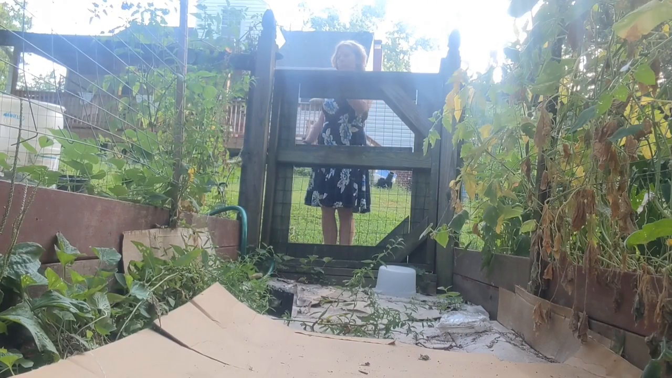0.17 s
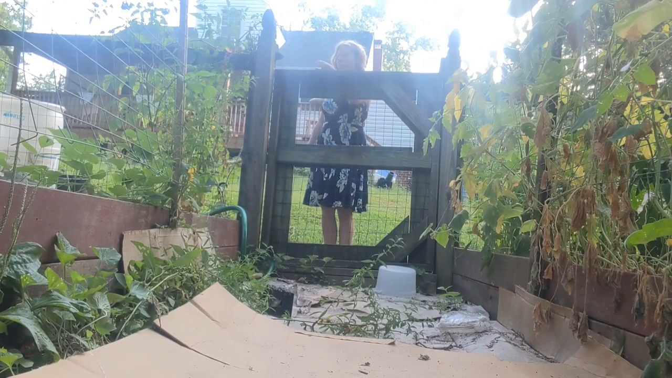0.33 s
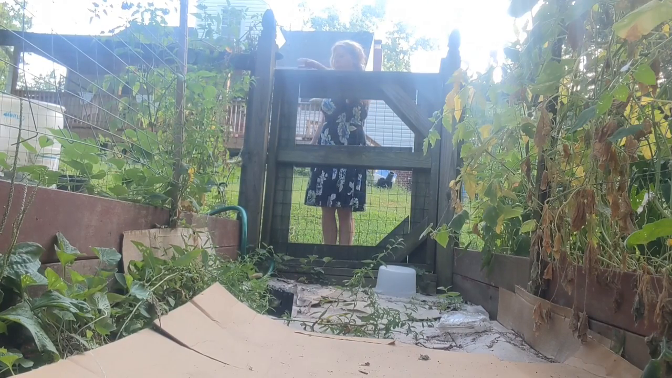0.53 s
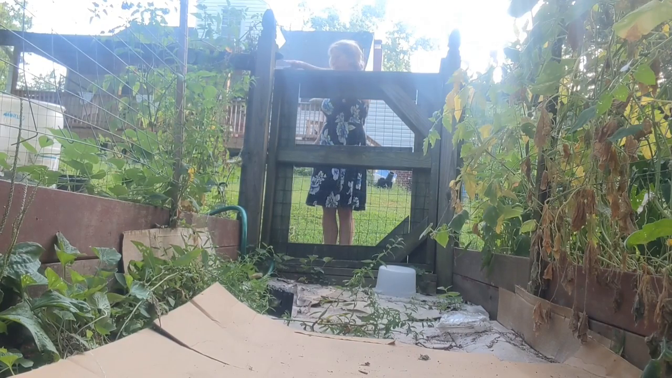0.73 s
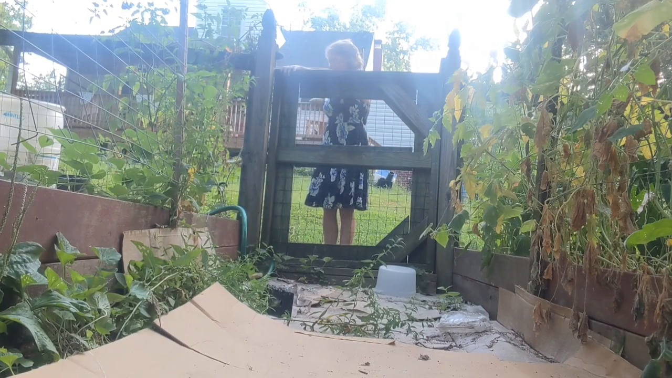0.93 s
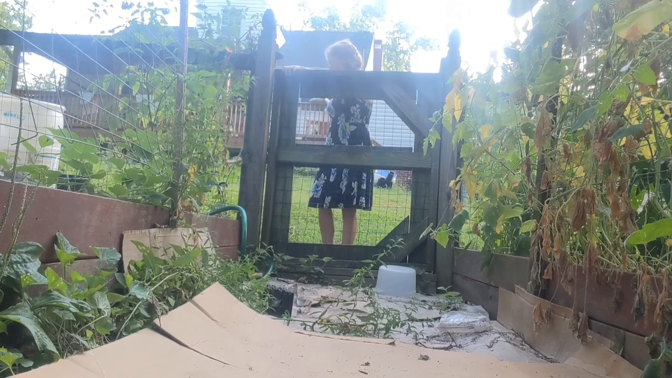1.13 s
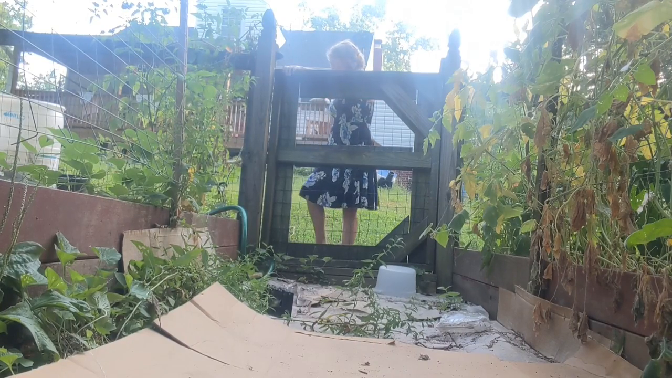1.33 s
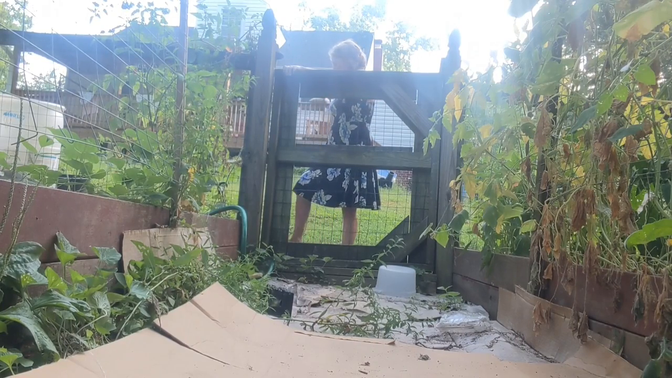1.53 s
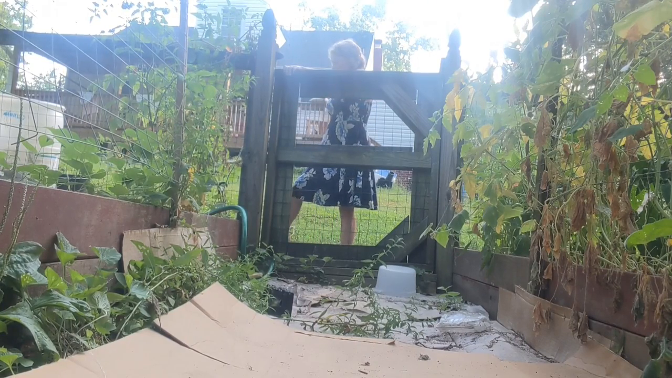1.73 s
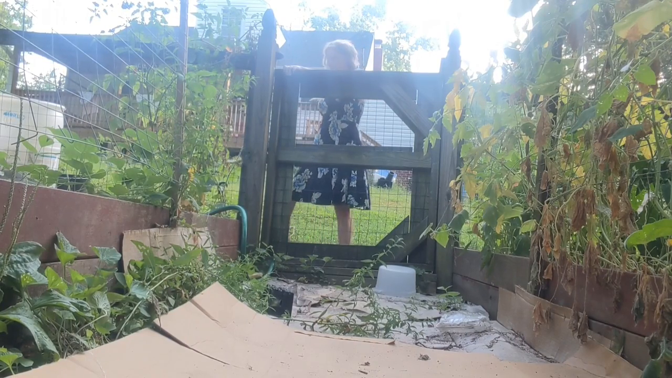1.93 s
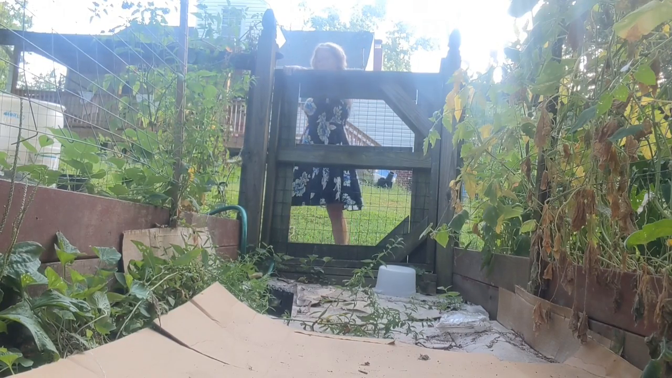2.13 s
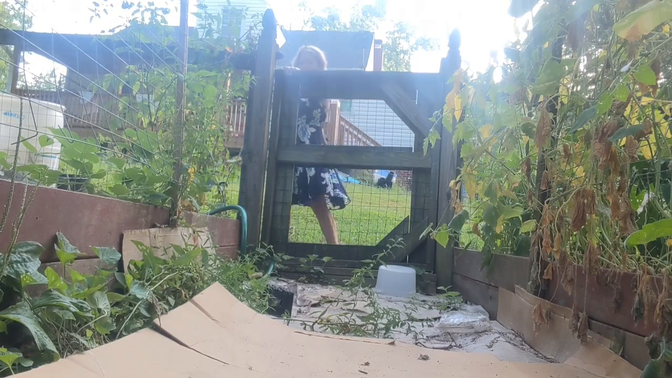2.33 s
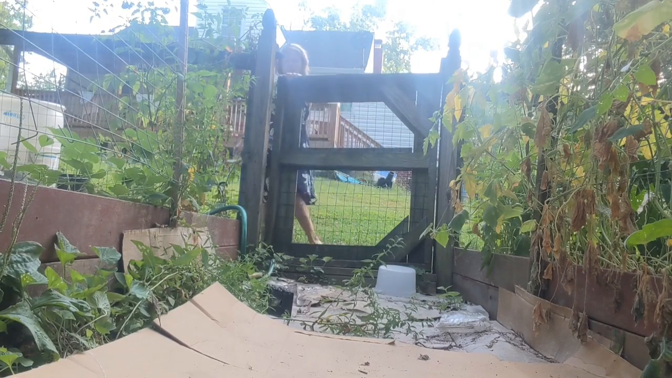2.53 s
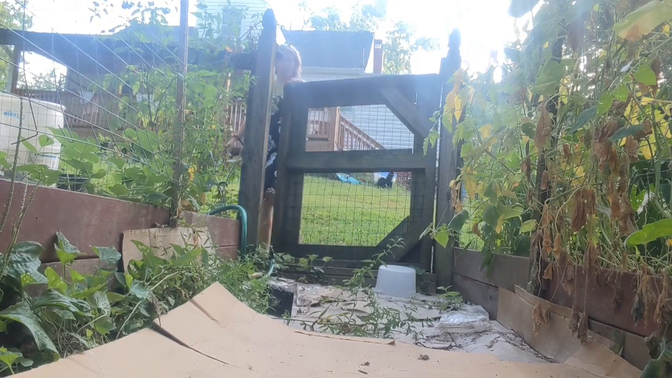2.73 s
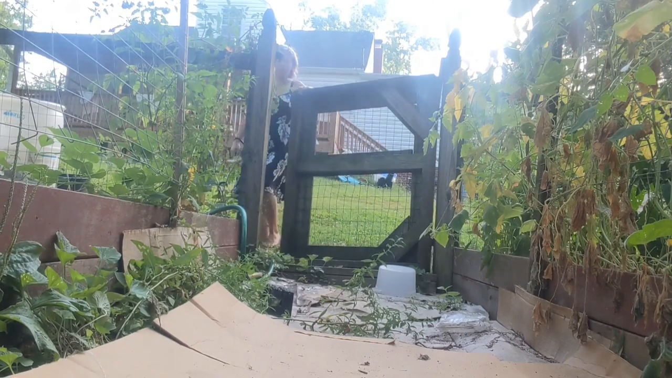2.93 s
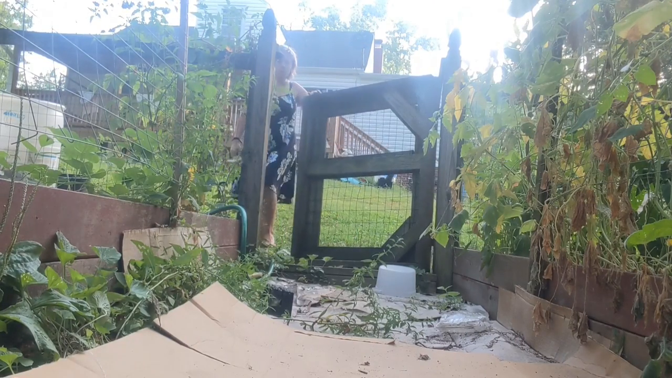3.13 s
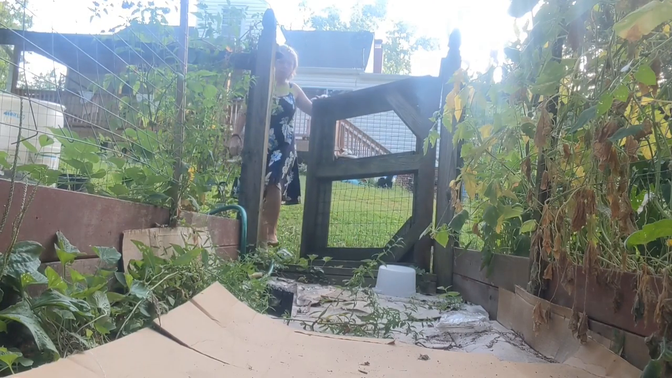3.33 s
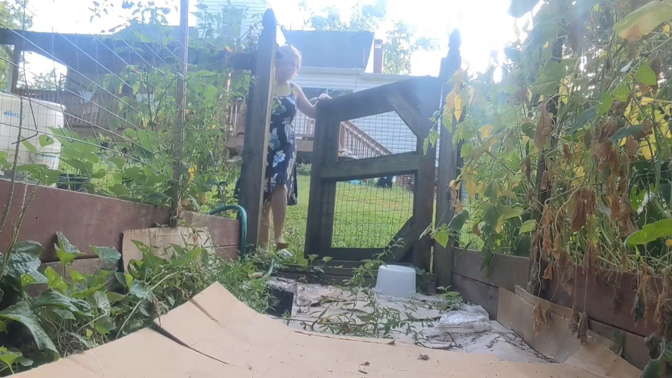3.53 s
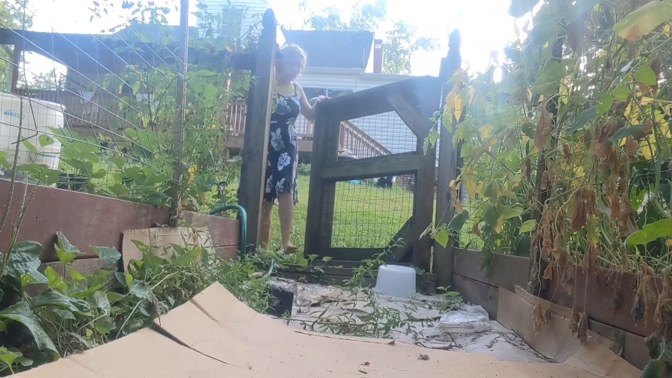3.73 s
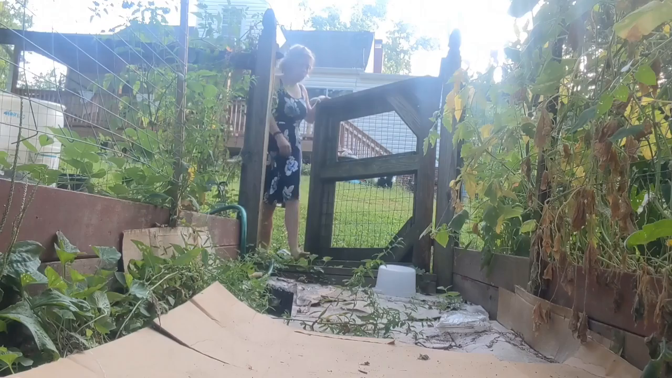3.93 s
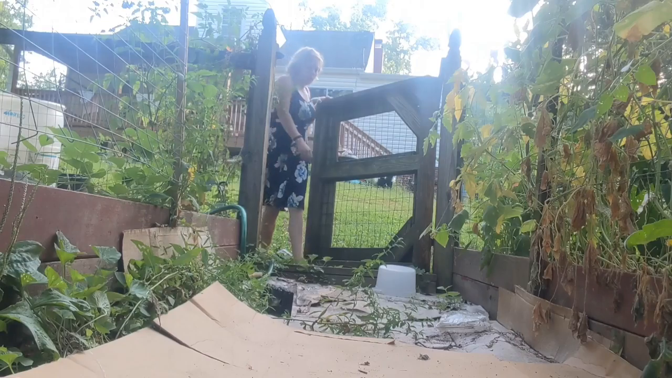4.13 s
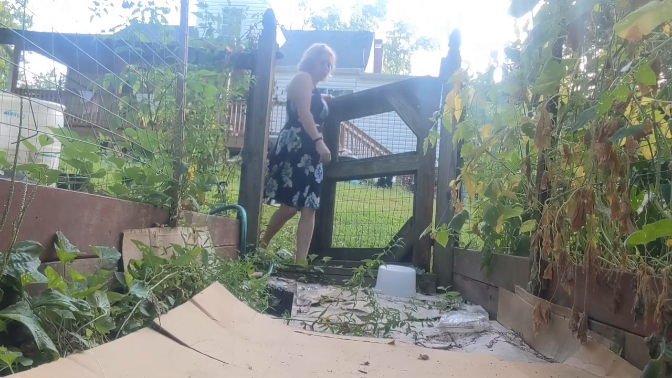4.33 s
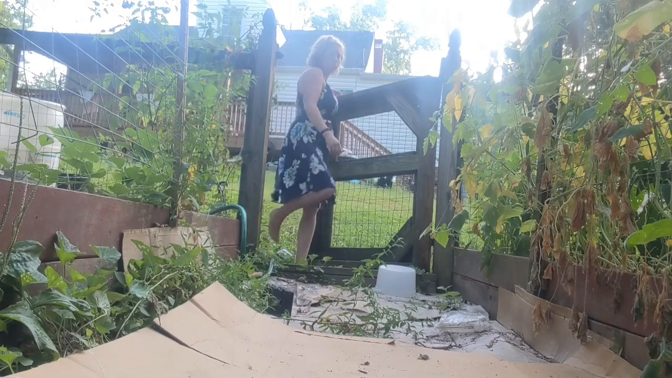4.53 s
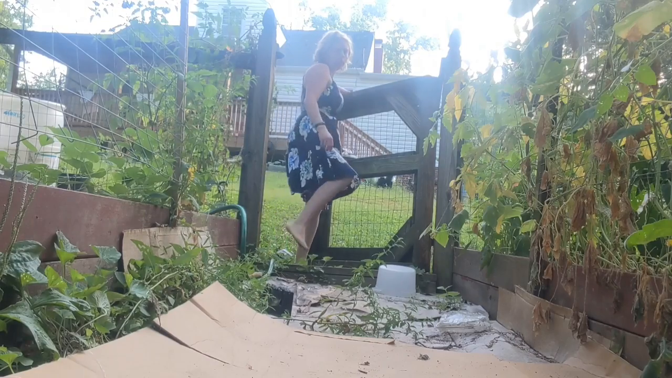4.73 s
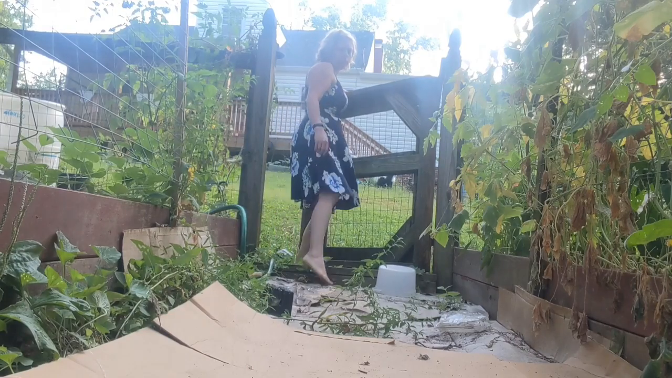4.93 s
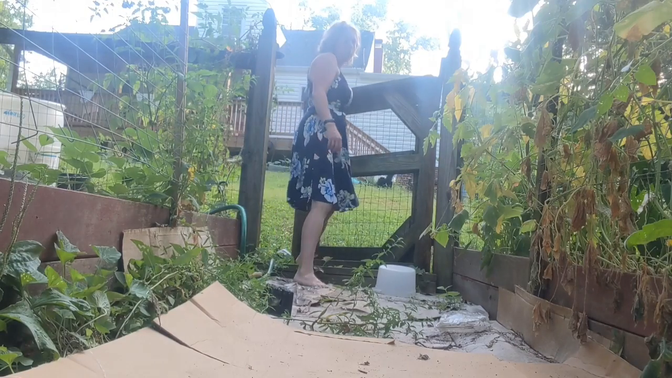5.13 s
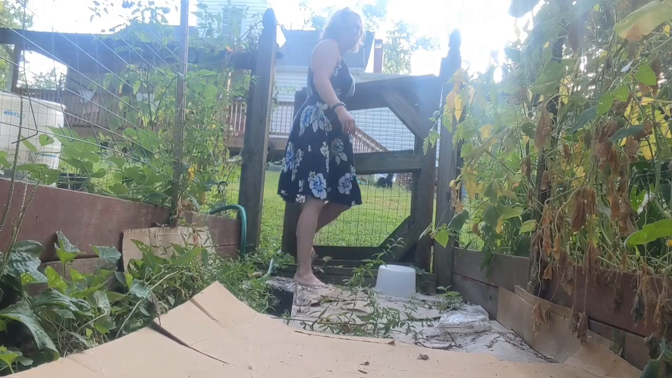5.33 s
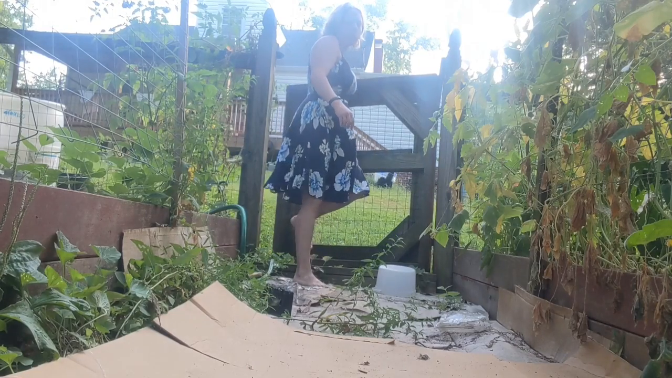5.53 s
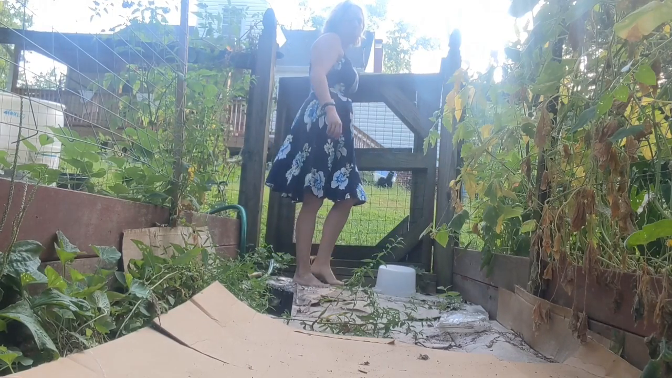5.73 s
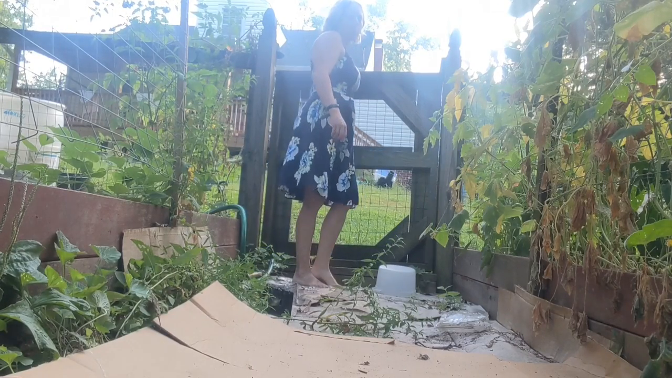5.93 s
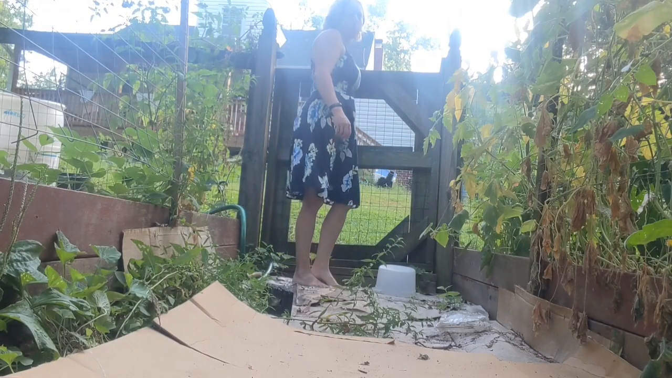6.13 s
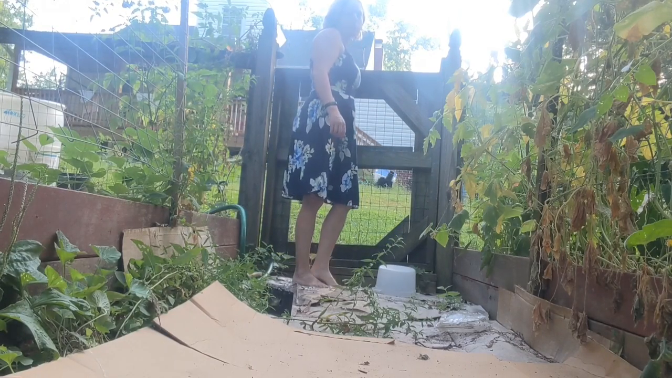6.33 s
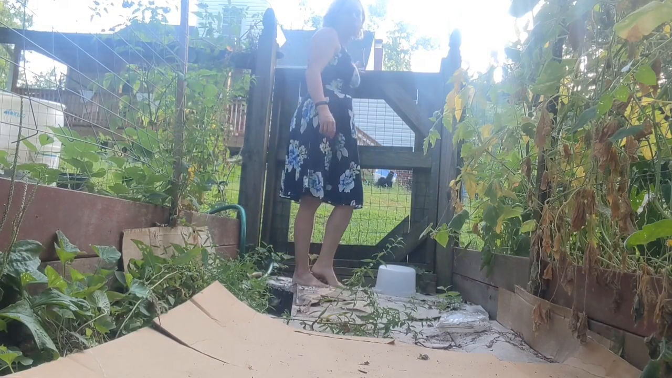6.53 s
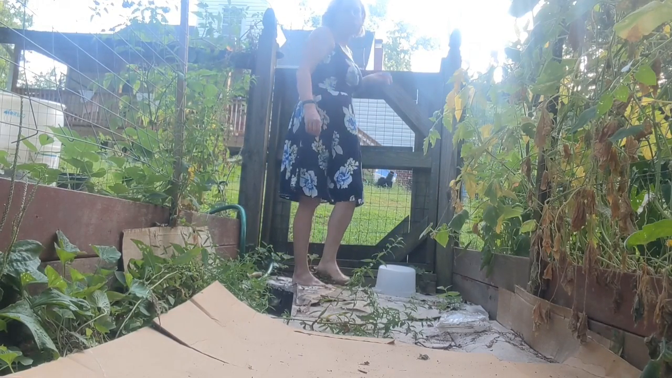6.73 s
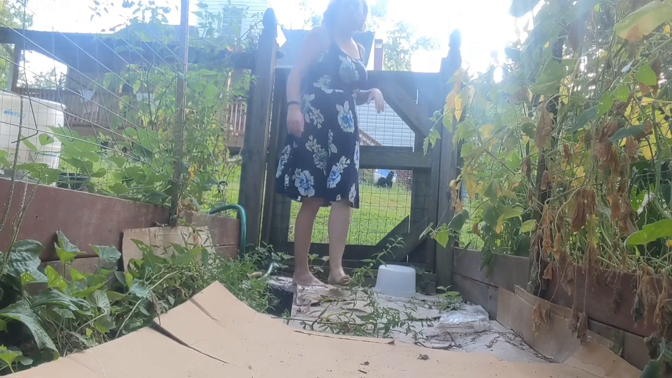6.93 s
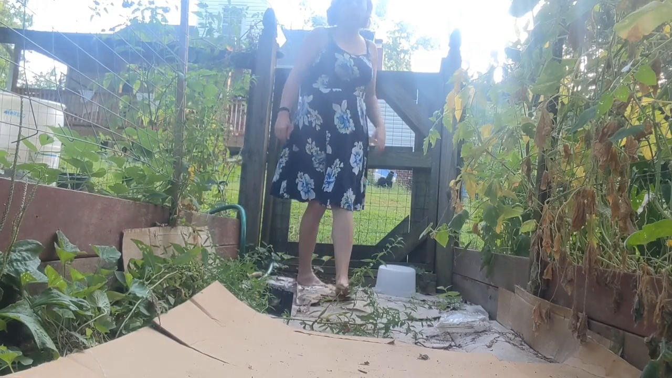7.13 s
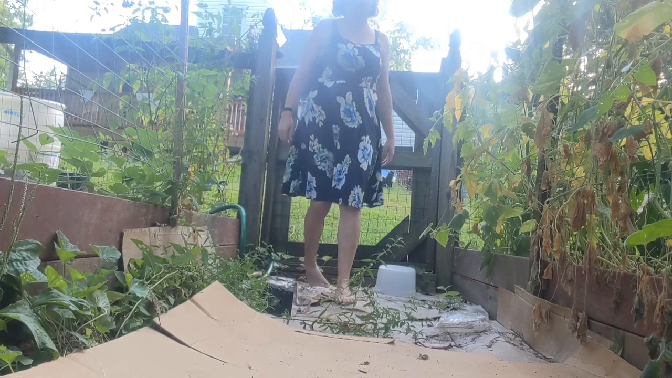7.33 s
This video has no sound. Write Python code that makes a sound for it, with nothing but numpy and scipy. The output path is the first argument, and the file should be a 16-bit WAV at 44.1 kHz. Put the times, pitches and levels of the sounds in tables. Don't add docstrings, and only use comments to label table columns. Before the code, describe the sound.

Birds whistle and trill over faint low rumble as a wooden garden gate clinks, knocks and scrapes, then slams with a steely rattle and deep thump.

```python
import sys
import numpy as np
from scipy import signal
from scipy.fft import rfft, irfft, next_fast_len
from scipy.io import wavfile
from scipy.ndimage import map_coordinates

SR = 44100
rng = np.random.default_rng(int(sys.argv[2]) if len(sys.argv) > 2 else 0)


def amplitude_ratio(level_db):
    exponent = np.asarray(level_db, float) / 20
    return 10 ** exponent


def store_pcm(level_fs):
    pcm = np.round(np.clip(level_fs, -1, 1) * 32767).astype(np.int16)
    wavfile.write(sys.argv[1], SR, np.atleast_2d(pcm).T)


N = 329338


def unit(x):
    return x / np.sqrt(np.mean(x ** 2) + 1e-20)


def along(points, hz):
    f, v = np.transpose(points)
    return np.interp(np.log(hz + 1), np.log(f + 1), v)


def curves(rows):
    s, *cols = np.transpose(rows)
    t = np.arange(N) / SR
    return np.array([np.interp(t, s, c, -120, -120) for c in cols])


def wobble(rate):
    t = np.arange(0, N + 32, 32) / SR
    knots = rng.standard_normal(int(N * rate / SR) + 4)
    return np.interp(np.arange(N) / SR, t, map_coordinates(knots, [t * rate]))


def filtered(x, response):
    m = next_fast_len(x.shape[-1] + 8192)
    spectrum = rfft(x, m) * response(np.fft.rfftfreq(m, 1 / SR))
    return irfft(spectrum, m)[..., :x.shape[-1]]


def resonances(modes):
    def response(f):
        total = 0
        for k, (centre, width, db) in enumerate(modes):
            damping = 1j * f * width
            total = total + (-1) ** k * amplitude_ratio(db) * damping / (centre ** 2 - f ** 2 + damping)
        return total
    return response


def rush(spectrum, alike, source):
    def mid_and_side(hz):
        angle = np.arccos(np.clip(along(alike, hz), -1, 1)) / 2
        return amplitude_ratio(along(spectrum, hz)) * np.array([np.cos(angle), np.sin(angle)])
    mid, side = filtered(source, mid_and_side)
    return unit(np.array([mid + side, mid - side]))


def blank():
    return np.zeros((2, N + 2 * SR))


def add(track, s, sound):
    at = round((s + 1) * SR)
    track[..., at:at + sound.shape[-1]] += sound


def song(notes, repeats, rough_db, bend, warble_hz, count=40, swell_db=0):
    track = blank()
    port_lag_s = np.array([[0], [.00007]])
    for start, phrase_db in repeats:
        for s, length, from_hz, to_hz, db in notes:
            u = np.linspace(0, 1, max(round(length * SR), 9))
            knots = np.linspace(0, 1, count)
            flutter, warble = [np.interp(u, knots, row) for row in rng.standard_normal((2, count))]
            remaining = (1 - u) ** bend
            hz = rng.normal(1, .005) * (to_hz + (from_hz - to_hz) * remaining) + warble_hz * warble
            phase = 2 * np.pi * (np.cumsum(hz) / SR - port_lag_s * hz.mean())
            level_db = db + phrase_db + rng.normal(0, 2.2) + rough_db * flutter - swell_db * remaining
            add(track, start + s, amplitude_ratio(level_db) * np.sin(np.pi * u) ** 0.21 * np.sin(phase))
    return track


# (time [s], tip [dB], shank [dB], twist [dB], hook [dB])
LATCH = [
    (2.4954, -49, -38.5, -44, -63),
    (3.856, -38, -40, -50, -36.5),
    (3.874, -39, -47, -48, -52),
    (4.6865, -52, -45, -52.5, -53),
    (5.4631, -65, -46.5, -39, -47.5),
    (6.1784, -34.5, -52, -30.5, -46),
    (6.561, -57, -42, -46.5, -67),
]
# (time [s], high modes [dB], 2.5 kHz mode [dB], screw head [dB],
# flight until the bar settles on the wood [s])
KEEPER = [(2.4954, -63, -49, -78, 0.038), (3.8566, -51, -46.5, -58, 0.047), (3.8742, -64, -56, -76, 0.03),
          (4.6874, -58, -65, -79, 0.039), (5.4645, -60, -43, -81, 0.051), (6.1769, -46.5, -53, -49.5, 0.11),
          (6.559, -83, -60, -82, 0.077)]
# (lower twist re upper [dB], hook partner re hook [dB], share of settling loss [ratio])
GRIP = [(-6.5, -9, 0.98), (-0.5, -26, 0.98), (-12, -12, 1.05), (-6, -5, 1.6), (-10.5, -4.5, 0.71),
        (-11.5, -2.5, .85), (-7.5, -10, 0.44)]
# (free time [s], slow partner re twist [dB])
TWIST_FREE = [(.1, -16), (.045, -5.5), (.04, -7), (0.054, -10), (0.075, -17), (.12, -25), (0.11, -23)]
# (frequency [Hz], level [dB], t60 [s])
BAR_MODES = [
    [(4752, 3, .11), (4762, -19, .5), (4585, -16, .15), (5052, -17, .15)],
    [(969, 0, .2), (987, -9, .1), (1050, -6, .07), (1750, -12, .06), (1841, -16, .25), (1470, -14, .05),
     (790, -18, .15), (1303, -18, .1)],
    [(2203, 0, .4), (2213, -12, .3)],
    [(2713, 0, .25), (2975, -14, .1)],
    [(3937, 1.5, .2)],
    [(3964, 1.5, .3)],
]
# (frequency [Hz], level [dB], t60 [s])
PLATE_MODES = [
    [(5752, 0, .12), (6145, -9, .15), (6512, -12, .25), (7280, -14, .12), (8068, -22, .25)],
    [(2527, 0, .2)],
    [(7640, 0, .14), (8323, -14, .12), (9211, -12, .2), (9628, -1, .16), (10170, -13, .12),
     (11150, -18, .2), (11550, -16, .08), (12370, -19, .18), (12730, -16, .2), (13550, -21, .15)],
]
# (frequency [Hz], level [dB], t60 [s])
TWIST_PARTNER = [(2724, 0, .7)]
SETTLE_DB = [29, 36, 0.94, 16, 11, 2.5, 12, 6.5, 4, 1.5]
RING = [1.03, 1.16, 1.36, 1.02, 1.16, 1.44, 0.95, 1.8, 1.1, 1.2]


def latch():
    track, t = blank(), np.arange(SR // 3) / SR
    flight_ring, settle_s = 1.8, 0.027
    families = BAR_MODES + PLATE_MODES + [TWIST_PARTNER]
    for strike, plate, grip, free in zip(LATCH, KEEPER, GRIP, TWIST_FREE):
        s, tip, shank, twist, hook = strike
        _, *plate_db, flight_s = plate
        low_db, partner_db, held = grip
        free_s, slow_db = free
        levels = [tip, shank, twist + low_db, twist, hook, hook + partner_db, *plate_db, twist + slow_db]
        for k, (family, family_db, loss_db, ring) in enumerate(zip(families, levels, SETTLE_DB, RING)):
            air_s = free_s if k == 3 else flight_s
            settling_db = loss_db * held * np.clip((t - air_s) / settle_s, 0, 1)
            aged = t - np.minimum(t, air_s) * (1 - 1 / flight_ring)
            for hz, db, t60 in family:
                spread, phase = rng.normal(0, .8, (2, 1)), rng.normal(0, .3, (2, 1))
                chatter = np.interp(t, np.linspace(0, .4, 30), rng.normal(0, 2.6, 30))
                tone = np.sin(2 * np.pi * hz * rng.normal(1, .0004) * t + phase)
                level_db = family_db + db + spread + chatter - 60 * aged / (ring * t60) - settling_db
                add(track, s, amplitude_ratio(level_db) * tone * (1 - np.exp(-t / 0.0016)))
    return track


# (time [s], peak [dB])
STEPS = [(2.673, -55), (3.477, -53), (5.094, -47), (5.606, -45.5), (5.81, -42), (5.899, -46),
         (6.185, -40.5), (6.152, -43.5), (6.23, -49), (6.297, -40), (6.303, -44), (3.274, -45)]
# (time [s], peak [dB], note [Hz])
RATTLES = [(2.404, -43.5, 837), (2.496, -35.5, 952), (3.722, -48.5, 1270), (4.326, -46, 980),
           (4.34, -51, 961), (4.365, -42.5, 1010), (4.378, -47.5, 950), (4.394, -49, 940),
           (4.688, -39, 996), (4.99, -48, 1050), (5.069, -50.5, 851), (5.463, -34.5, 1087),
           (5.49, -38.5, 1060), (6.047, -40, 976), (6.179, -31, 1007), (6.187, -30.5, 975),
           (6.21, -34, 1050), (6.231, -44, 686), (6.25, -37.5, 1000), (6.273, -39.5, 930),
           (6.285, -43.5, 940), (6.312, -49, 975), (6.302, -48, 1290), (6.325, -49.5, 972),
           (6.34, -49.5, 952), (6.356, -50.5, 970), (6.402, -53, 800), (5.516, -51, 1310),
           (3.866, -41.5, 1490), (3.869, -40, 1740), (3.875, -46, 790), (6.562, -38.5, 966),
           (6.689, -55.5, 710), (6.987, -46.5, 995)]
# (time [s], peak [dB])
CLACKS = [
    (3.857, -38.5),
    (3.876, -44.5),
]
# (time [s], peak [dB], note [Hz])
SCRAPES = [(2.337, -38.5, 1566), (2.441, -41, 1394), (3.218, -55, 1840), (3.244, -44.5, 1627),
           (3.269, -42, 1700), (5.182, -49.5, 1305), (5.396, -45.5, 1250), (6.122, -49, 1790),
           (6.131, -40.5, 880), (6.149, -38, 1210), (6.195, -42.5, 1490), (5.473, -41, 1750),
           (2.948, -51.5, 970), (3.185, -49.5, 1690), (6.165, -38, 1700), (6.143, -40, 1670),
           (6.156, -31.5, 1423)]
# (frequency [Hz], width [Hz], level [dB])
PLANK = [(255, 62, 0), (404, 29, 0), (970, 300, -12), (1700, 1400, 4), (3000, 320, 6)]
# (frequency [Hz], density [dB per Hz])
CRACK = [(2000, -7), (3500, 8), (6000, -2), (8000, -8.5), (12000, -22), (15500, -36)]


def knocks():
    track, t = blank(), np.arange(SR // 8) / SR
    # time [s], peak [dB], note [Hz], brightness [dB], t60 [s]
    contacts = [(*row, 418, -10.5, 0.038) for row in STEPS]
    contacts += [(*row, 1100, -1.5, 0.097) for row in CLACKS]
    contacts += [(*row, -24, 0.043) for row in RATTLES]
    contacts += [(*row, -30, 0.063) for row in SCRAPES]
    plank = resonances(PLANK)
    for s, db, hz, bright_db, t60 in contacts:
        common, own = rng.standard_normal(len(t)), rng.standard_normal((2, len(t)))
        rise = 0.001493 * amplitude_ratio(-.5 * (db + 39.0))
        shape = amplitude_ratio(db - 60 * t / t60) * (1 - np.exp(-t / rise))
        spot = resonances([(hz, 0.84 * hz, 9)])

        def struck_wood(f):
            wood = (spot(f) + amplitude_ratio(4.5) * plank(f)) / (1 + 1j * f / 5500) ** 3
            return wood + amplitude_ratio(bright_db + 5.5 + along(CRACK, f))

        noise = filtered(shape * (common + 0.83 * own), struck_wood)
        add(track, s - rise, noise + amplitude_ratio(-1) * shape * np.sin(2 * np.pi * hz * t))
    return track


# (time [s], peak [dB], frequency [Hz], t60 [s])
BOOMS = [
    (2.047, -25, 57.5, 0.29),
    (2.998, -26.5, 54, 0.27),
    (3.86, -36, 52, 0.35),
    (6.149, -24, 110.3, 0.48),
    (6.169, -5.5, 76, 0.055),
    (6.202, -12, 89, 0.23),
    (6.375, -15.5, 61.6, 0.087),
]


def booms():
    track, t = np.zeros(N + 2 * SR), np.arange(SR // 2) / SR
    for s, db, hz, t60 in BOOMS:
        swing = amplitude_ratio(db - 1 - 60 * t / t60) * np.sin(2 * np.pi * hz * t)
        add(track, s, swing * (1 - np.exp(-t / 0.01)))
    return track[SR:SR + N]


# (time [s], length [s], start [Hz], end [Hz], level [dB])
SQUEAKS = [
    (3.286, .035, 1295, 1390, -66),
    (3.328, 0.054, 1457, 1432, -62.5),
    (3.379, 0.042, 1434, 1384, -61),
    (3.473, 0.017, 2140, 2140, -65),
    (5.179, 0.022, 1386, 1350, -56),
    (5.378, 0.034, 1150, 1164, -61),
]
SQUEAK_ORDERS = [2, 1, 0.5, -9]


def hinge_squeaks():
    slips = []
    for s, length, from_hz, to_hz, db in SQUEAKS:
        for order, order_db in enumerate(SQUEAK_ORDERS, 1):
            slips.append((s, length, order * from_hz, order * to_hz, db + order_db))
    return song(slips, [(0.0024, 0)], rough_db=4.5, bend=1.3, warble_hz=59, count=8)


# (time of peak [s], length [s], scuff [dB], cloth [dB])
MOVES = [(0.512, 0.067, -90, -72), (1.252, 0.16, -100, -74), (1.552, .06, -95, -75),
         (2.342, 0.018, -58, -64), (2.5, 0.012, -62.5, -77), (3.822, .012, -77, -66),
         (2.608, 0.2, -68.5, -74.5), (2.715, 0.074, -66, -68.5), (2.945, 0.13, -66.5, -79),
         (3.247, 0.075, -64, -71), (3.292, 0.055, -66, -66), (3.356, 0.054, -73, -80),
         (3.387, 0.036, -70, -71), (4.671, 0.027, -69, -74), (4.977, 0.31, -74, -81),
         (5.178, 0.039, -66.5, -75), (5.399, 0.042, -64.5, -85), (5.68, 0.24, -75, -85),
         (2.834, 0.066, -81, -82), (6.147, 0.026, -53, -65), (6.182, 0.028, -52, -61),
         (7.2, 0.32, -76, -75), (7.455, 0.054, -71, -70)]
# (frequency [Hz], density [dB per Hz])
SCUFF = [(200, -1.5), (500, -0.5), (1500, 3), (3000, 1.5), (5000, -1.5), (7000, -25), (10000, -52)]
# (frequency [Hz], density [dB per Hz])
CLOTH = [(3000, -40), (4500, -8), (6500, 0), (8000, -4), (9000, -9), (12000, -5), (15500, -20)]


def rustle():
    s, length, *levels = np.transpose(MOVES)[..., None]
    knots = np.arange(0, N / SR + .001, .001)
    late = knots - s
    share, fade_db = 0.28, 4.5
    shape_db = -fade_db * np.maximum(-late / share, late / (1 - share)) / length
    t = np.arange(N) / SR
    scuff_db, cloth_db = [np.interp(t, knots, np.max(db + shape_db, axis=0)) for db in levels]

    def grains():
        return rng.standard_normal((2, N)) * amplitude_ratio(3 * wobble(260) + 1.2 * wobble(30))

    scuff = amplitude_ratio(scuff_db + 14.5) * rush(SCUFF, [(600, 0.95), (3000, 0.16)], grains())
    cloth = amplitude_ratio(cloth_db + 0.5) * rush(CLOTH, [(4000, 0.082)], grains())
    return scuff + cloth


# (time [s], length [s], start [Hz], end [Hz], level [dB])
LEAD_IN = [(1.512, 0.013, 4000, 4110, -63), (1.54, .02, 7600, 5200, -58), (1.688, .01, 6630, 6200, -54),
           (1.706, .016, 6720, 4700, -56), (1.713, .008, 5600, 5430, -50), (1.75, 0.013, 3660, 3550, -54),
           (1.757, 0.014, 3300, 3200, -51), (1.78, 0.018, 3540, 3760, -49), (1.8, 0.072, 3720, 3695, -63),
           (1.827, 0.0077, 4400, 5930, -44), (1.832, 0.0097, 5510, 5100, -46),
           (1.855, 0.012, 3260, 2680, -52), (1.89, 0.009, 3570, 6390, -45.5),
           (1.897, .008, 5380, 5650, -46), (1.908, 0.0068, 5700, 4770, -41.5),
           (1.92, 0.01, 3300, 2750, -46), (2.01, 0.013, 4020, 4330, -43.5), (2.105, 0.044, 3560, 3610, -46),
           (2.195, 0.011, 3970, 3520, -53), (2.32, 0.012, 3700, 3600, -44), (2.445, .012, 3650, 3800, -50)]
# (time in figure [s], length [s], start [Hz], end [Hz], level [dB])
RISE = [(0, 0.012, 2780, 2940, -43), (.017, 0.011, 3300, 3490, -45), (.062, 0.02, 4550, 5420, -44),
        (.07, 0.008, 5750, 5350, -43), (.076, .009, 5200, 4400, -39), (.084, 0.0092, 4400, 3630, -41)]
# (time [s], level [dB])
RISE_AT = [(1.96, -1), (2.075, -1.5)]
# (time in figure [s], length [s], start [Hz], end [Hz], level [dB])
TRILL = [(-.003, 0.013, 4370, 4100, -44.5), (0, 0.0227, 4108, 4006, -40), (0, 0.0197, 3786, 3657, -39),
         (.014, 0.0177, 3627, 2870, -36.5), (.038, 0.0118, 4784, 3430, -40),
         (.04, 0.0205, 4063, 3900, -45.5), (.054, .011, 2646, 2930, -36), (.067, 0.0143, 3000, 2095, -44.5)]
# (time [s], level [dB])
TRILL_AT = [(2.204, -3.5), (2.332, -3), (2.453, -2), (2.601, -2.5), (2.724, -1.5), (2.852, -3)]
# (frequency [Hz], width [Hz], level [dB])
WREN_PATH = [(3900, 840, 3.5)]
ONCE = [(0, 0.0088)]  # (time [s], level [dB])


def wren():
    parts = [(LEAD_IN, ONCE), (RISE, RISE_AT), (TRILL, TRILL_AT)]
    notes = sum(song(*part, rough_db=1.0, bend=1.13, warble_hz=70.0) for part in parts)
    return filtered(notes, lambda f: 0.76 + resonances(WREN_PATH)(f))


# (time in phrase [s], length [s], start [Hz], end [Hz], level [dB])
WHISTLE = [(-.014, 0.288, 6060, 8230, -60.5), (.236, 0.044, 6260, 6950, -63), (.278, .028, 7010, 6970, -54)]
# (time in phrase [s], length [s], start [Hz], end [Hz], level [dB])
WHISTLE_DROP = [(.281, .017, 6900, 3000, -56)]
# (time [s], level [dB])
WHISTLE_AT = [(0.898, -2), (3.925, -3), (6.902, -1)]
# (time [s], length [s], start [Hz], end [Hz], level [dB])
WHISTLE_OPEN = [(.681, 0.19, 6360, 8040, -55), (3.726, 0.17, 6880, 8560, -59.5),
                (6.691, 0.26, 6600, 8040, -63.5)]
# (time [s], length [s], start [Hz], end [Hz], level [dB])
PEEPS = [(4.665, 0.11, 7200, 8500, -68), (4.86, 0.043, 5740, 5500, -67), (4.92, 0.035, 5200, 4700, -64),
         (4.135, 0.031, 5450, 5440, -71), (5.12, 0.075, 5500, 5420, -65), (5.34, 0.032, 5500, 5400, -68),
         (5.385, .04, 4550, 4600, -62), (5.652, 0.033, 4500, 4530, -65), (5.785, 0.057, 9000, 8960, -72),
         (7.17, 0.08, 7470, 7500, -69.5), (7.3, .11, 7750, 7450, -76)]


def whistler():
    high = song(PEEPS, ONCE, rough_db=8.5, bend=1.7, warble_hz=69.5)
    for part in [(WHISTLE, WHISTLE_AT), (WHISTLE_OPEN, ONCE)]:
        high = high + song(*part, rough_db=5.0, bend=2.6, warble_hz=22, swell_db=12)
    return high + song(WHISTLE_DROP, WHISTLE_AT, rough_db=2, bend=1.05, warble_hz=30)


# (time [s], length [s], start [Hz], end [Hz], level [dB])
FAR_CALLS = [(-.05, 0.2, 4030, 4215, -50.5), (-.05, 0.17, 3656, 3810, -52), (.06, .3, 4070, 3930, -67),
             (6.44, 0.16, 3690, 3710, -61), (1.441, 0.056, 3980, 4120, -63),
             (4.155, 0.07, 2910, 3125, -60.5), (5.62, 0.1, 2960, 3120, -57.5), (6.35, .13, 3470, 4060, -55),
             (6.445, 0.1, 4020, 4190, -54.5), (6.53, 0.29, 4080, 4110, -68)]


def far_calls():
    track = blank()
    blur_hz = 480
    for s, length, from_hz, to_hz, db in FAR_CALLS:
        t = np.arange(round(length * SR)) / SR
        knots = rng.standard_normal((4, 400))
        a, b, c, d = [map_coordinates(row, [t * blur_hz]) for row in knots]
        phase = 2 * np.pi * np.cumsum(from_hz + (to_hz - from_hz) * t / length) / SR
        cosine, sine = np.cos(phase), np.sin(phase)
        smear = np.array([a * cosine + b * sine, c * cosine + d * sine])
        add(track, s, amplitude_ratio(db) * np.sin(np.pi * t / length) ** .7 * (smear + .3 * smear[::-1]))
    return track


# (frequency [Hz], t60 [s])
YARD = [(200, 0.18), (2000, 0.3), (4500, 0.56), (7000, 0.66), (11000, 0.021)]


def yard(x, wet_db, lag_s, lumpy_db=1.5):
    hz, t, z = signal.stft(rng.standard_normal((2, SR // 2)), SR, nperseg=256)
    lumps = amplitude_ratio(lumpy_db * rng.standard_normal(len(t)))
    decay = amplitude_ratio(-60 * t / along(YARD, hz)[:, None])
    tail = signal.istft(z * lumps * decay, SR, nperseg=256)[1]
    tail = np.pad(tail / np.linalg.norm(tail[0]), ((0, 0), (round(lag_s * SR), 0)))
    wet = signal.oaconvolve(x, tail, axes=1)[:, :x.shape[1]]
    return (x + amplitude_ratio(wet_db) * wet)[:, SR:SR + N]


# (order [multiple of shaft rate], level [dB rms])
FAN = [(2, -50), (3, -46), (4, -62), (6, -59), (7.8, -69), (8.75, -65), (12, -73)]


def fan():
    shaft_hz = 19.74
    turn = 2 * np.pi * shaft_hz * np.arange(N) / SR
    lead = np.array([[.5], [-.5]])
    hum = np.zeros((2, N))
    for order, db in FAN:
        level = amplitude_ratio(db + 2.0 + 0.68 * np.sqrt(order) * wobble(5.074))
        hum += level * np.sin(order * (turn + 0.21 * lead) + 0.84 * wobble(3))
    return hum


# (time [s], level [dB])
RUMBLE = [(0.0, -60), (0.83, -60), (1.25, -59), (4.62, -59.5), (4.99, -56), (5.74, -63.5), (6.3, -50.5),
          (6.55, -58), (7.47, -58.5)]
# (frequency [Hz], density [dB per Hz])
RUMBLE_COLOUR = [(20, -33), (34, -18), (50, -6), (72, -4), (100, -7.5), (125, -6.5), (145, -14), (180, -13),
                 (210, -49), (400, -97)]


def rumble():
    low = rush(RUMBLE_COLOUR, [(40, 0.23), (70, 0.62), (130, -0.82)], rng.standard_normal((2, N)))
    return amplitude_ratio(curves(RUMBLE) + 11.5 + 0.33 * wobble(5.3)) * low


# (frequency [Hz], density [dB per Hz])
AIR_COLOUR = [(90, -11), (150, 2.5), (300, -15), (727, -20), (840, -16.5), (1650, -19.5), (2840, -17),
              (4000, -21), (5600, -24.5), (6500, -32.5), (8000, -42.5), (8700, -48), (10000, -41),
              (15600, -44)]
# (frequency [Hz], coherence [ratio])
AIR_ALIKE = [(60, 0.66), (130, -0.73), (290, -0.33), (640, 0.7), (1410, 0.079), (3100, -0.21), (6820, 0.16),
             (15000, -0.16)]


def hiss():
    return amplitude_ratio(-53 + 0.91 * wobble(3.39)) * rush(AIR_COLOUR, AIR_ALIKE, rng.standard_normal((2, N)))


def scene():
    steel = yard(latch(), wet_db=-14.5, lag_s=0.0047)
    wood = yard(knocks() + hinge_squeaks(), wet_db=-10.5, lag_s=.006)
    near_bird = yard(wren(), wet_db=-6.0, lag_s=.003, lumpy_db=-0.5)
    other_birds = yard(whistler() + far_calls(), wet_db=-4.5, lag_s=.0035, lumpy_db=1.0)
    return steel + wood + booms() + rustle() + near_bird + other_birds + fan() + rumble() + hiss()


# (frequency [Hz], left minus right [dB])
PORTS = [(60, -5.5), (110, -1.5), (200, 2.5), (380, -1), (700, -0.5), (1290, -1.0), (2380, 0.5), (4400, -7),
         (8120, -8.5), (15000, -15.5)]


def low_pass(x):
    return signal.sosfilt(signal.butter(12, 15710, fs=SR, output="sos"), x)


def record(dry):
    def port_response(hz):
        band = (hz < 15715) / (1 + (34 / (hz + 1)) ** 8)
        return band * amplitude_ratio(along(PORTS, hz) * np.array([[.5], [-.5]]))
    mix = filtered(dry, port_response)
    return low_pass(mix)


dry = scene()
out = record(dry)
store_pcm(out)
```